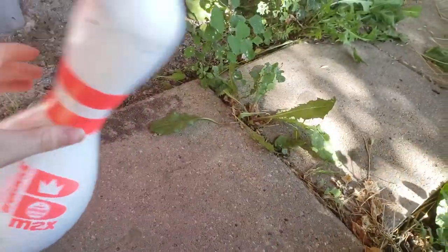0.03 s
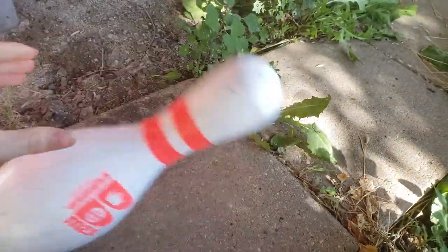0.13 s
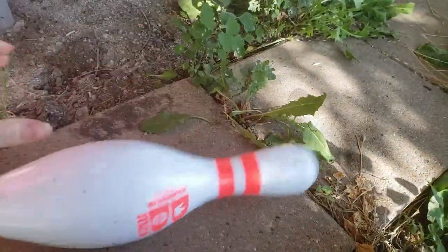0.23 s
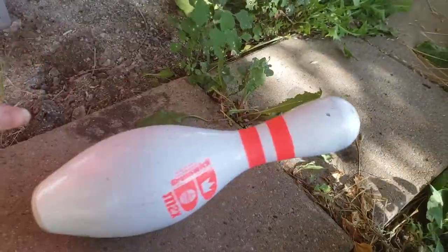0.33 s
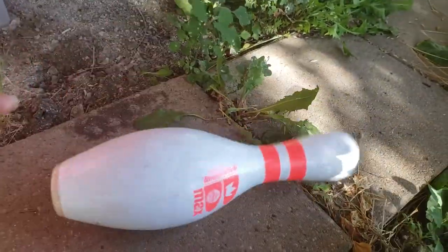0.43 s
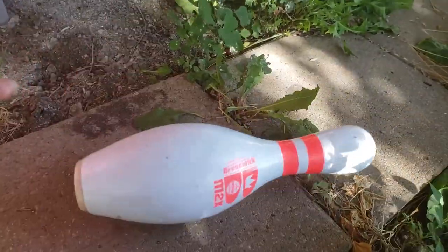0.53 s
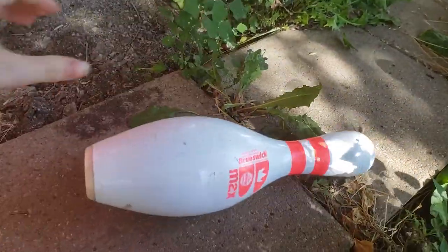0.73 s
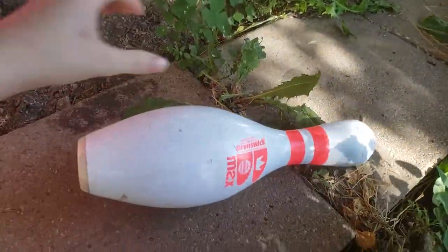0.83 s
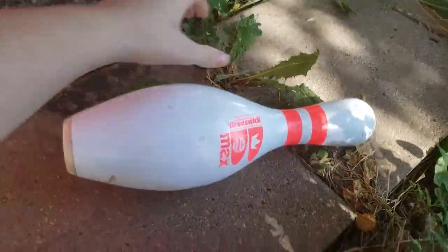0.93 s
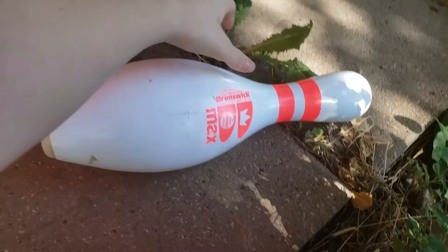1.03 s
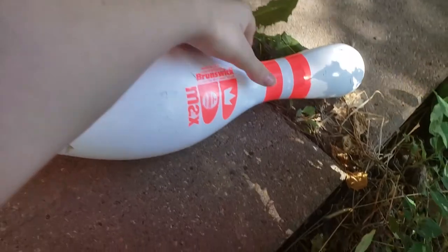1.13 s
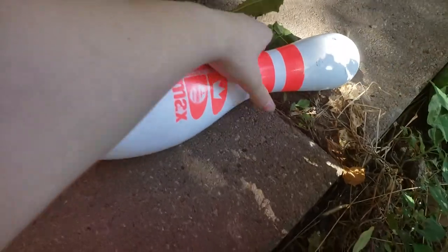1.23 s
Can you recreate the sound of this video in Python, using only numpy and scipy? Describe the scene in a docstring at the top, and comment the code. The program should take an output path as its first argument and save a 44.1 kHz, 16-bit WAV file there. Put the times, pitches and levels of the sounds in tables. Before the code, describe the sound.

A wooden bowling pin topples onto stone, knocking sharply and rattling to rest.

```python
"""A wooden bowling pin topples onto a stone slab in a garden, close by.
Its belly and head strike in turn: each hit thuds and crunches grit, the hard ones make the
wood bend and ring, and the pin rattles to rest. A wall and the yard send the sound back.
Faint metal tones, like a wind chime, hang over the outdoor hush,
and a hand softly bumps the microphone."""
import sys
import numpy as np
from scipy import signal
from scipy.fft import rfft, irfft
from scipy.io import wavfile

SR = 44100
rng = np.random.default_rng(int(sys.argv[2]) if len(sys.argv) > 2 else 0)


def bounce(signal):
    """Save signal as a 16-bit WAV file at the path given by the first command-line argument."""
    frames = np.transpose(np.atleast_2d(signal))
    limited = np.clip(frames, -1, 1)
    pcm = np.round(limited * 32767).astype(np.int16)
    wavfile.write(sys.argv[1], SR, pcm)


N = 57330
T = np.arange(N) / SR

# The tone of the outdoor hush. Each row: frequency in Hz, relative level in dB.
HUSH_TONE = [(30, -4.5), (58, 1.5), (90, -3.5), (140, -2.5), (235, -11), (450, -10.5), (850, -17.5),
             (1150, -16.5), (1450, -24.5), (6900, -27), (8100, -37.5), (12600, -35), (16000, -39.5)]
# How loud the hush is. Each row: time in seconds, level in dB.
HUSH_LOUDNESS = [(0, -49.5), (.2, -46), (.3, -56.5), (.72, -53.5), (.9, -59.5), (1.1, -60), (1.3, -62)]
# How wide the hush is. Each row: frequency in Hz, width (0 is centred, 1 is fully wide).
HUSH_WIDTH = [(35, 1), (300, 0.24), (2000, 1), (10000, 1)]
# Metal tones. Each row: start in seconds, pitch in Hz, level in dB, fade time in seconds.
# A fade time is always the time a sound takes to drop by 60 dB.
CHIME_TONES = [(0, 1109, -60, 3), (0, 980, -72, 7), (.712, 1595, -65, 20), (.712, 1598, -76, 6),
               (.712, 2316, -63, 1.5), (.712, 2319, -67, 1.9), (0.734, 3196, -54, 0.27),
               (0.732, 4150, -61, 0.22)]
# Bumps of the hand. Each row: start in seconds, level in dB.
HAND_BUMPS = [(0.13, -60), (0.292, -46), (.55, -42), (0.665, -43.5), (0.773, -50.5), (0.905, -47),
              (1.031, -45), (1.089, -52)]
# The pin's hits on the slab. Each row: start in seconds, thud strength in dB, the thud's low and
# high edges in Hz, then levels in dB for the note, the low, middle and top grit, and the yard's share.
HITS = [ (0.183, -27.5, 249.5, 767, -80, -47, -39, -36.5, -6.5),
        (0.2332, 16.5, 120, 602, -40.5, -40, -48, -44, -3.5),
        (0.2404, 18, 79, 191, -55.5, -35, -21.5, -15, -5),
        (0.2573, 12.5, 106, 193.5, -37, -21, -24.5, -35.5, -3.5),
        (0.2779, 15.5, 290, 2545, -3.5, -20.5, -32.5, -24, 8.5),
        (0.2915, 11, 330, 2010, -55.5, -47, -52.5, -41.5, -7),
        (0.3645, 22.5, 165, 1450, -13, -52, -33.5, -28, -7.5),
        (0.4535, 18, 130, 1140, -29.5, -33, -39.5, -42, -8),
        (0.5055, 16.5, 91, 498, -50, -30.5, -41, -36.5, 3),
        (0.5229, 15, 138, 1990, -11, -21.5, -33, -24.5, -4.5),
        (0.5907, 12.5, 76.3, 435, -71, -26.5, -35, -37.5, -8),
        (0.6497, 8.5, 89.4, 452, -65, -34.5, -42, -47, -16),
        (0.6900, 6.5, 121.2, 528, -74, -40, -54, -59, -6),
        (0.7101, 4, 85, 524, -39.5, -45.5, -37.5, -24, -3), (0.7331, -1, 94, 433, -68, -42, -44, -47, -1),
        (0.7373, -10.5, 150, 500, -71, -38.5, -41, -40.5, -2),
        (0.757, -9.5, 125.4, 390, -77, -55, -59, -72, -19.5),
        (0.772, -6.5, 70, 346, -74, -71, -67, -82, -19), (0.8095, -8.5, 120, 406, -56, -44.5, -64, -55, 1),
        (0.815, -30, 900, 2120, -68, -59, -74, -70, -8),
        (0.826, -12.5, 103.6, 378, -77, -59.5, -74, -72.5, -21)]
# Peaks and dips in the thud's tone. Each row: frequency in Hz, gain in dB, narrowness (Q).
THUD_TONE = [(143, 4, 3.8), (237, -3.5, 4.7), (367, 4.5, 1.7), (655, -3.5, 12), (905, 4, 2.2),
             (1456, 1.5, 11), (1940, 0, 2.5)]
# Where the thud lags: in the bass and near the pin's note. Each row: frequency in Hz, narrowness (Q).
THUD_DELAYS = [(144, 0.57), (1250, 3.6)]
# Low, middle and top grit. Each row: low edge in Hz, high edge in Hz, fade time in seconds.
GRIT_RANGES = [(1450, 2900, 0.016), (4800, 6900, .021), (10000, 14800, 0.016)]
# How the pin's hard coat colours the grit. Each row: frequency in Hz, gain in dB, narrowness (Q).
COAT_TONE = [(3670, 5.5, 7.9), (5450, 1.5, 12), (7040, 6, 7), (8700, -6, 4)]
# The note swells and dips as the pin swings round. Each row: time in seconds, gain in dB.
NOTE_SWELL = [(.279, -7), (.286, -1), (.298, 4), (.305, 4.7), (.311, -1.5), (.322, 3), (.345, 3), (.366, 1)]
# The pin's weaker notes. Each row: pitch in Hz, gain in dB, fade time in seconds.
FAINT_NOTES = [(395.7, -64, 0.2226), (614, -56, 0.038), (783, -60, 0.13), (1438, -51.5, 0.025),
               (1857, -57.5, 0.063), (2235, -51.5, .06)]
# Echoes off the wall. Each row: delay in seconds, gain in dB.
WALL_ECHOES = [(0.0126, -13.5), (0.0227, -25)]
# Sound lingering in the yard. Each row: frequency in Hz, gain in dB, fade time in seconds.
YARD_TAIL = [(100, -15.5, .28), (406, -14.5, 0.44), (850, -8, 0.28), (1350, -13.5, 0.13), (2200, -7, 0.16),
             (4222, -13, 0.13), (6950, -9, 0.16), (15000, -13, 0.2)]


def amp(db):
    """Turn decibels into a number to multiply by."""
    return 10 ** (np.asarray(db) / 20)


def at_hz(table, hz, column=1):
    """Read between a table's rows, with octaves evenly spaced."""
    table = np.array(table)
    return np.interp(np.log(hz), np.log(table[:, 0]), table[:, column])


def butter(x, hz, kind, order=2):
    """Keep only the lows, the highs or one band of a sound."""
    sections = signal.butter(order, np.clip(hz, 10, SR * .45), kind, fs=SR, output="sos")
    return signal.sosfilt(sections, x + 1e-18)


def colour(x, table):
    """Give a sound each peak and dip in a table."""
    for hz, db, q in table:
        gain, angle = amp(db / 2), 2 * np.pi * hz / SR
        width, tuning = np.sin(angle) / (2 * q), -2 * np.cos(angle)
        boost, cut = width * gain, width / gain
        x = signal.lfilter([1 + boost, tuning, 1 - boost], [1 + cut, tuning, 1 - cut], x)
    return x


def delay(x, seconds):
    """Make one channel arrive later."""
    return np.interp(T - seconds, T, x, left=0)


def from_right(x):
    """Make stereo that reaches the right side just before the left."""
    return np.array([delay(x, seconds=.00006), x])


def strike(start, rise_s, fade_s):
    """The loudness of something struck: a quick rise, then a fade."""
    age = np.maximum(T - start, 0)
    return (1 - np.exp(-age / rise_s)) * amp(-60 * age / fade_s)


def stereo_noise(width):
    """White noise, from centred (width 0) to fully wide (1)."""
    mid, side = rng.standard_normal((2, N))
    return np.array([mid + width * side, mid - width * side]) / np.sqrt(1 + width ** 2)


def hush():
    """Soft outdoor noise, widest in the treble and the deepest bass."""
    hz = np.maximum(np.fft.rfftfreq(N, 1 / SR), 1)
    spectra = rfft(rng.standard_normal((2, N))) * amp(at_hz(HUSH_TONE, hz))
    spectra[1] *= at_hz(HUSH_WIDTH, hz)
    mid, side = irfft(spectra, N)
    air = np.array([mid + side, mid - side])
    return air / air.std() * amp(np.interp(T, *np.transpose(HUSH_LOUDNESS)))


def chime():
    """Thin metal tones some way off; pairs close in pitch waver slowly."""
    out = 0
    for start, hz, db, fade_s in CHIME_TONES:
        cycles = hz * (T - start) + rng.random((2, 1)) / 4
        out += amp(db) * strike(start, rise_s=0.008, fade_s=fade_s) * np.sin(2 * np.pi * cycles)
    return out


def hand_bumps(hz=66, rise_s=0.00867):
    """Each bump sways the microphone for a few slow swings."""
    out = 0
    for start, db in HAND_BUMPS:
        age = np.maximum(T - start, 0)
        shape = age / rise_s * np.exp(1 - age / rise_s)
        out += amp(db) * shape * np.sin(2 * np.pi * hz * age)
    return out


def thud(start, db, low_hz, high_hz):
    """The slab stops the pin short: one pulse, wider for a softer hit, coloured by pin and slab."""
    pulse = np.zeros(N)
    pulse[int(start * SR)] = -amp(db)
    pulse = butter(pulse, high_hz, "low", order=8)
    pulse = butter(pulse, low_hz, "high")
    pulse = colour(pulse, THUD_TONE)
    for hz, q in THUD_DELAYS:  # holding some pitches back spreads the pulse over a few swings
        angle = 2 * np.pi * hz / SR
        width = np.sin(angle) / (2 * q)
        feedback = [1 + width, -2 * np.cos(angle), 1 - width]
        pulse = signal.lfilter(feedback[::-1], feedback, pulse)
    return from_right(pulse)


def grit(start, levels_db, rough_db=3.5):
    """Sand cracks under the pin's hard coat in a short burst of uneven grains."""
    sizes = amp(rough_db * rng.standard_normal(N // 16 + 1)).repeat(16)[:N]
    grains = stereo_noise(width=0.96) * sizes
    out = 0
    for (low, high, fade_s), db in zip(GRIT_RANGES, levels_db):
        shape = strike(start, rise_s=0.0013, fade_s=fade_s)
        burst = butter(grains * shape, [low, high], "band")
        burst /= np.linalg.norm(burst, axis=1, keepdims=True)  # same energy however the grains fall
        out += amp(db) * burst * np.linalg.norm(shape)
    return colour(out, COAT_TONE) * amp([[-1.5], [1.5]])  # louder on the right


def bending_note(hz=1152):
    """The pin bends to and fro and rings; every hit adds energy to this main note."""
    energy = 0
    for start, _, _, _, note_db, *_ in HITS:
        energy += (amp(note_db) * strike(start, rise_s=0.00085, fade_s=0.18)) ** 2
    swell = amp(np.interp(T, *np.transpose(NOTE_SWELL)))
    return from_right(np.sqrt(energy) * swell * np.sin(2 * np.pi * hz * T))


def overtone(hz=3625):
    """A short, higher bending note sharpens the crack of the hard hits."""
    energy = 0
    for start, _, _, _, note_db, *_ in HITS:
        db = -22 + 1.9 * note_db  # grows faster than the main note
        energy += (amp(db) * strike(start, rise_s=0.00085, fade_s=0.063)) ** 2
    return from_right(np.sqrt(energy) * np.sin(2 * np.pi * hz * T))


def faint_notes(knocks):
    """The knocks leave the pin's weaker notes ringing."""
    out = 0
    for hz, db, fade_s in FAINT_NOTES:
        decay, angle = amp(-60 / (fade_s * SR)), 2 * np.pi * hz / SR
        feedback = [1, -2 * decay * np.cos(angle), decay ** 2]
        out += amp(db) * signal.lfilter([0, np.sin(angle)], feedback, knocks)
    return out


def wall(knocks, top_hz=1000):
    """The knocks bounce back as two dull echoes."""
    echoes = [sum(amp(db) * delay(side, seconds) for seconds, db in WALL_ECHOES) for side in knocks]
    return butter(np.array(echoes), top_hz, "low")


def yard(sound):
    """Sound scatters round the yard, each band of pitches fading at its own pace."""
    edges_hz = np.geomspace(60, 17000, 15)
    tail = 0
    for low, high in zip(edges_hz, edges_hz[1:]):
        hz = np.sqrt(low * high)
        shape = strike(0, rise_s=0.001, fade_s=at_hz(YARD_TAIL, hz, column=2))
        band = butter(stereo_noise(width=.58), [low, high], "band", order=4)
        tail += band * shape / np.linalg.norm(shape) * amp(at_hz(YARD_TAIL, hz))
    return signal.fftconvolve(sound, tail, axes=1)[:, :N]


def scene():
    """Add up the pin's knocks and notes, their echoes and the background."""
    note, high_note = bending_note(), overtone()
    knocks = 0
    into_yard = amp(-10) * note + high_note
    for start, thud_db, low_hz, high_hz, _, *grit_db, yard_db in HITS:
        knock = thud(start, thud_db, low_hz, high_hz) + grit(start, grit_db)
        knocks += knock
        into_yard += amp(yard_db) * knock
    pin = knocks + note + high_note + faint_notes(knocks)
    return pin + wall(knocks) + yard(into_yard) + chime() + hand_bumps() + hush()


def record(dry):
    """Flatten peaks beyond full scale, then cut the treble above 16300 Hz."""
    treble_cut = signal.ellip(8, .1, 60, 16300, fs=SR, output="sos")
    return signal.sosfiltfilt(treble_cut, np.clip(dry, -1, 1))


dry = scene()
out = record(dry)
bounce(out)
```